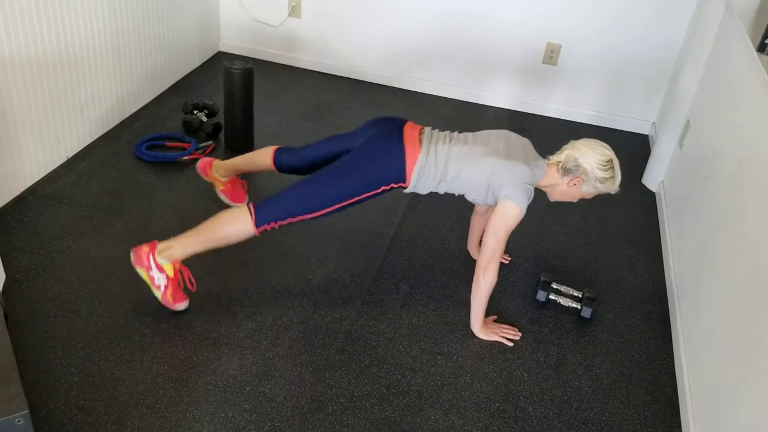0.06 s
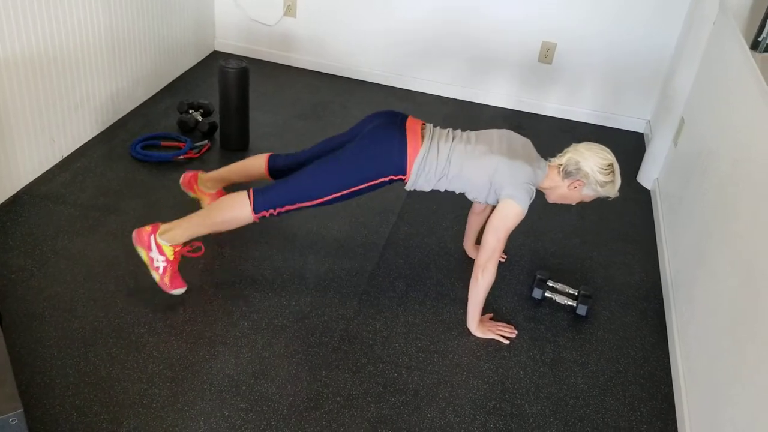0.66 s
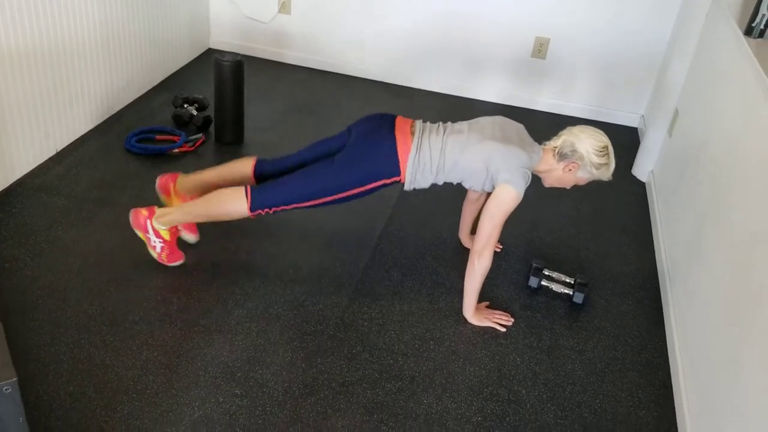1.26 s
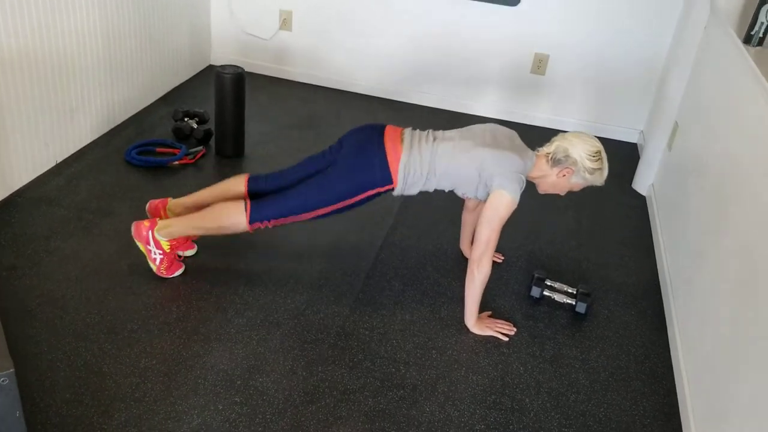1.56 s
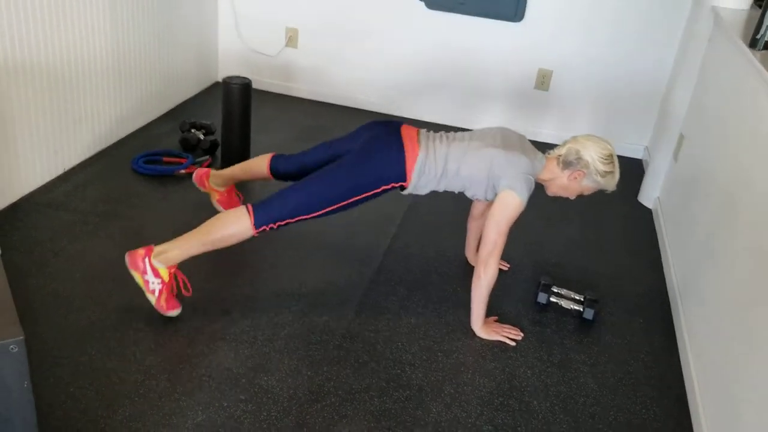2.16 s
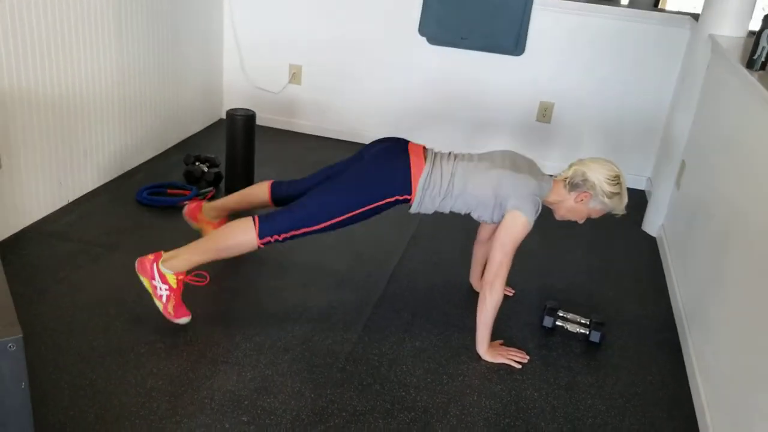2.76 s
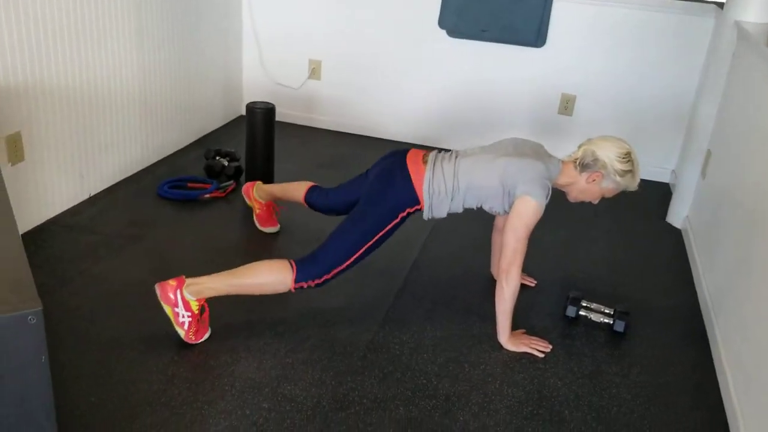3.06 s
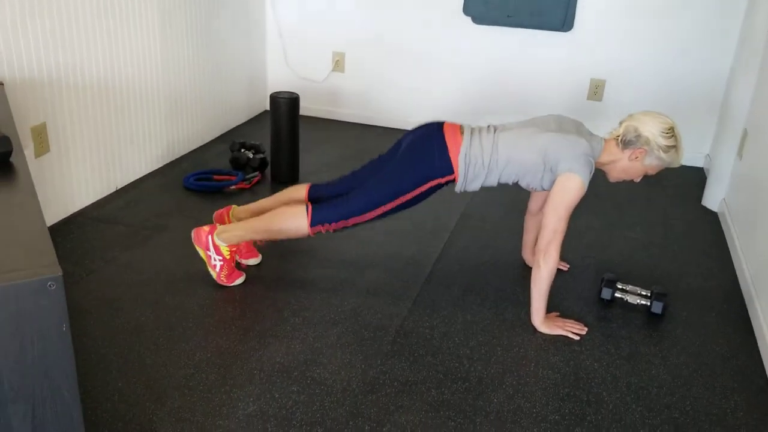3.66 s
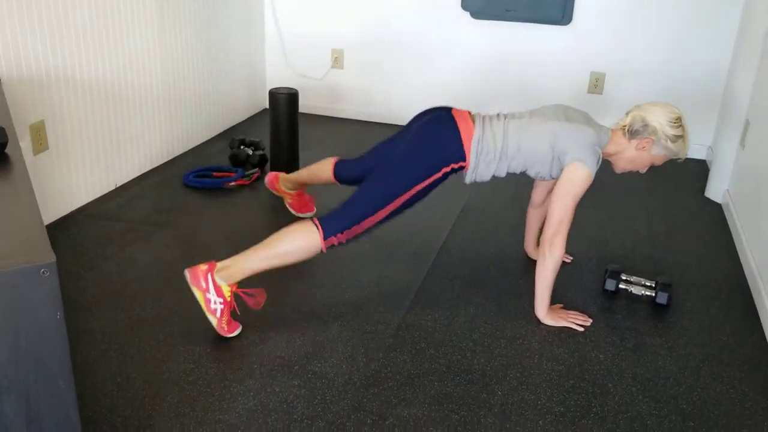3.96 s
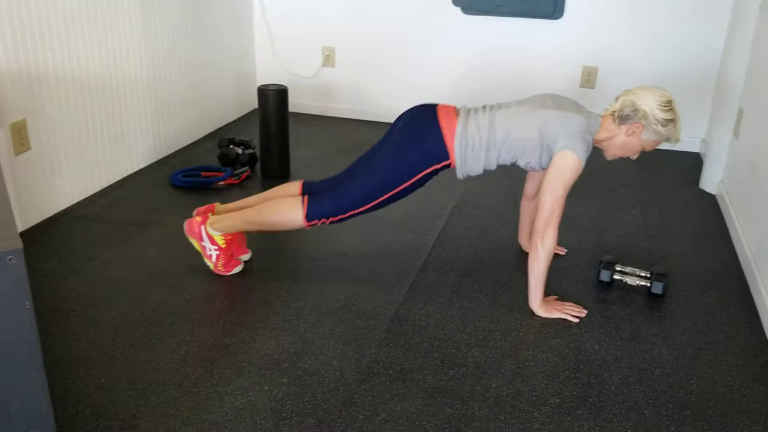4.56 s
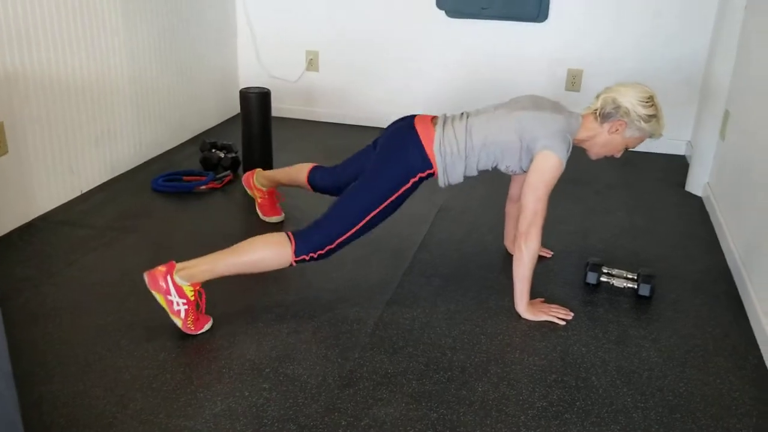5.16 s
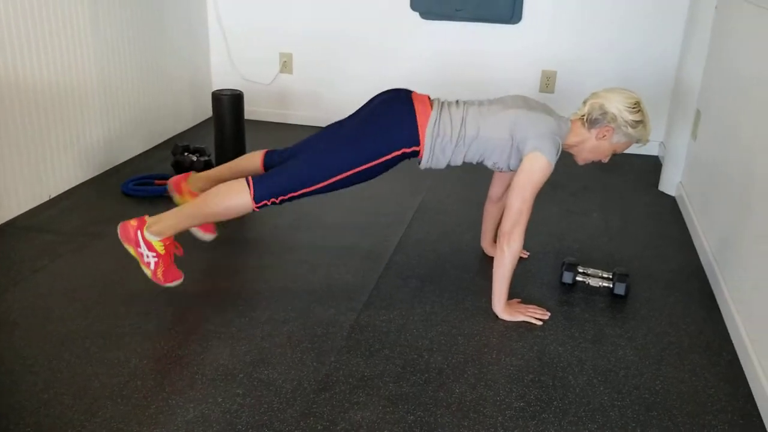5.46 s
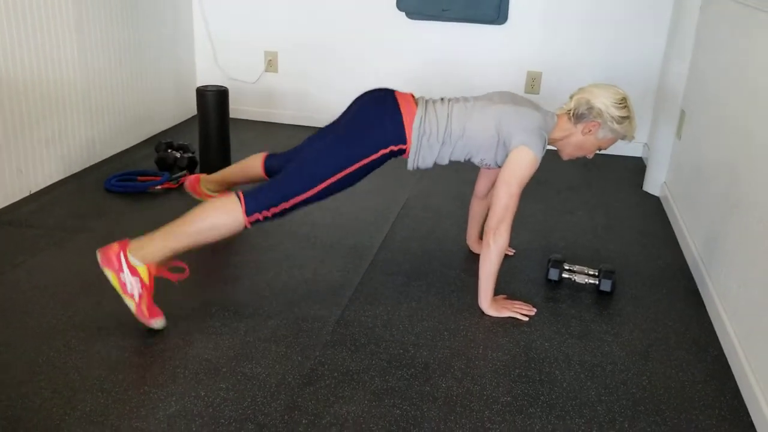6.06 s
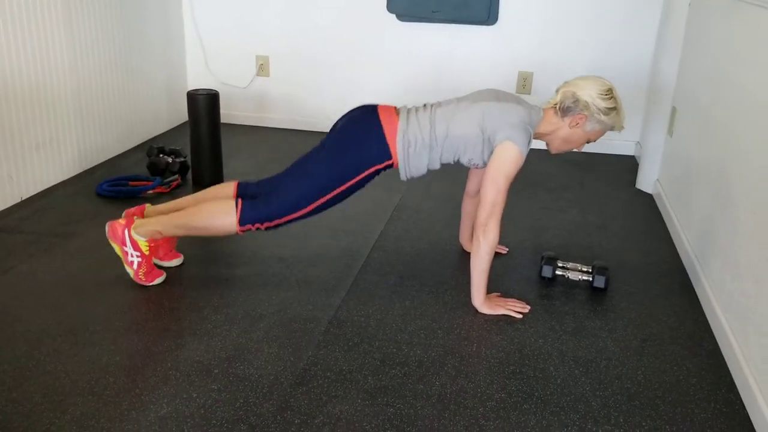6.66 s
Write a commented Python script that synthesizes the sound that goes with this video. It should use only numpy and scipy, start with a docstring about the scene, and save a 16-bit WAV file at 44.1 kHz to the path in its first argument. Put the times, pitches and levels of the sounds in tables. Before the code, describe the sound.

Sneakers slap and thump on a rubber floor about twice a second in a small, echoing room.

```python
"""Sneakers slap and thump on rubber flooring, about twice a second: plank jacks in a small, hard room.
Two shoes land almost together. The toes slap and scuff, the body's weight follows and booms through
the floor, and the walls answer. Leggings swish faintly before each landing.
A camera close by hears it over low room rumble and its own hiss, and turns the quietest treble down."""
import sys
import numpy as np
from scipy import signal
from scipy.fft import rfft, irfft, next_fast_len
from scipy.io import wavfile
from scipy.ndimage import uniform_filter1d

SR = 44100
rng = np.random.default_rng(int(sys.argv[2]) if len(sys.argv) > 2 else 0)


def unload_wav(signal):
    """Save mono or channel-first audio to the path in sys.argv[1] as 16-bit WAV at rate SR, clipped to [-1, 1]."""
    wavfile.write(
        sys.argv[1],
        SR,
        np.round(np.clip(np.atleast_2d(signal).T, -1, 1) * 32767).astype(np.int16),
    )


N = 299439

# Cue list, one row per landing: (time [s], second shoe's lag [s], first shoe against second [dB],
# sole strike [dB], body weight [dB], tread scuff [dB], scuff's upper edge [Hz])
LANDING_CUES = [ (-.41, 0.023, 0, -30, -41, -61, 4000), (.129, 0.021, -0.5, -35, -30.5, -61.5, 5100),
                (.671, .015, -12.5, -33, -27.5, -56, 5500), (1.207, 0.016, -1, -31, -26.5, -54.5, 5100),
                (1.716, 0.017, -2.5, -31, -31, -60, 3100), (2.235, 0.013, 5, -32.5, -26, -66, 5300),
                (2.762, .017, -1.5, -33.5, -42, -58.5, 3200), (3.304, 0.0092, -4, -34, -37, -64.5, 5100),
                (3.853, 0.026, -2, -30, -32, -56, 5000), (4.409, .017, -6.5, -30, -31, -57, 5600),
                (4.923, .015, -7, -29.5, -30, -59, 3900), (5.459, .013, -4, -29, -30.5, -56, 6200),
                (6.007, 0.013, 7.5, -31.5, -33, -53, 6500), (6.517, 0.0097, -16, -33, -29, -62.5, 5200)]
# A sole drags over the rubber: (time [s], decay time [s], knock [dB], scuff [dB])
DRAG_CUES = [(.205, 0.018, -57, -67.5), (4.491, 0.022, -44, -71.5), (5.983, 0.033, -42, -80)]
# The floor under the body's weight: (ratio to thump pitch [1], level [dB], swell time [s])
THUMP_MODES = [(0.289, -28, 0.056), (.43, -14, .04), (.73, -14, .03), (0.999, 6, 0.01562),
               (1.22, -15.5, 0.0296)]
# Standing waves between floor, ceiling and walls: (frequency [Hz], level [dB], T60 [s])
STANDING_MODES = [(152.1, -4.5, 0.61), (172.3, -5, 0.34), (233.3, -1.5, 0.36), (263.4, -4.5, 0.43),
                  (329.4, -5.5, 0.35), (491.3, 3, 0.089)]
# Tone colour of each layer: (frequency [Hz], spectral level [dB])
RUMBLE_EQ = [(22, -11), (45, -3), (100, -5), (200, -13.5), (350, -10.5), (700, -36), (1300, -30),
             (2500, -42.5), (5000, -78.5)]  # low room tone
HISS_EQ = [(1470, -22.5), (2500, -2), (6590, -9), (8350, -9.5), (11300, -6.5), (15100, -6), (15500, -8.5)]  # the camera's own noise
CLOTH_EQ = [(800, -8), (1400, 3.5), (3000, -2), (5000, -5), (8000, -27)]  # rubbing leggings
KNOCK_EQ = [(25, -46), (70, -1.5), (130, 3.5), (170, 1.5), (265, 0), (330, -3), (410, -6.5), (485, -7),
            (640, -14), (1000, -36), (2500, -62)]  # the sole's soft knock
SLAP_EQ = [(200, -32), (480, -13), (690, -4), (800, -1), (930, 0), (1060, 1), (1220, 2.5), (1550, -2.5),
           (2000, -10.5), (2600, -11.5), (4000, -9.5), (8000, -28)]  # its flat slap
SCUFF_EQ = [(600, -24.5), (1800, 5), (2700, 3.5), (3600, 1), (4700, -4.5), (5800, -10.5), (7300, -28),
            (9000, -18.5)]  # tread on rubber
FIZZ_EQ = [(3000, -16), (6500, -8), (8700, -25), (9500, 0.5), (10300, 1), (11500, 1), (12100, -10.5),
           (15500, -21.5)]  # high fizz of scuffs and swishes, coloured by the microphone's 9-12 kHz peak
# The reverb's fast and slow decay: (frequency [Hz], T60 [s])
FAST_DECAY = [(60, 0.39), (150, 0.51), (400, 0.35), (1200, 0.47), (3000, 0.61), (6000, 0.42), (11000, 0.36)]
SLOW_DECAY = [(60, 0.77), (300, 1.39), (700, 1.284), (1400, 1.136), (2500, 1.5), (5000, 0.42),
              (11000, 0.26)]
# Stereo image of diffuse sound: (frequency [Hz], left-right correlation [1])
STEREO_CORRELATION = [(60, 1), (125, 0.95), (250, 0.85), (500, 0.69), (1000, -0.037), (2000, -0.041),
                      (5000, -0.015)]
# The camera's noise suppressor when shut: (frequency [Hz], gain [dB])
SHUT_EQ = [(400, 2.15), (1200, 1), (2800, -5), (6000, -4), (11000, -4.5)]

RING = 52920  # samples in one hit with its tail
t = np.arange(RING) / SR
BLOW_S = .1  # a hit's level is its rms over this opening stretch


def amp(db):
    """Decibels to gain."""
    return 10 ** (np.asarray(db) / 20)


def along(points, hz):
    """Read a curve of (frequency [Hz], value) points on a log axis."""
    freqs, values = np.transpose(points)
    return np.interp(np.log(hz + 1), np.log(freqs), values)


def norm(x):
    """Scale to an average energy of 1 per channel."""
    return x / np.sqrt(np.mean(np.sum(x ** 2, axis=-1)) + 1e-20)


def convolve(a, b):
    """Stereo convolution, one ring long."""
    return signal.fftconvolve(np.atleast_2d(a), np.atleast_2d(b), axes=1)[:, :RING]


def colour(spectrum, edge_hz=SR, order=12):
    """Minimum-phase impulse response of an EQ curve; a softer contact has a lower upper edge."""
    size = RING // 6
    hz = np.fft.rfftfreq(size, 1 / SR)
    gain = amp(along(spectrum, hz)) / np.sqrt(1 + (hz / edge_hz) ** order)
    cepstrum = irfft(np.log(gain + 1e-6), size)
    cepstrum[1:size // 2] *= 2
    cepstrum[size // 2 + 1:] = 0
    return irfft(np.exp(rfft(cepstrum)), size)


def add(track, at_s, sound, db):
    """Lay a hit into the track at a level taken over one blow."""
    start = int(at_s * SR)
    level = np.sqrt(np.mean(sound[:, :int(BLOW_S * SR)] ** 2)) + 1e-12
    track[:, max(start, 0):start + RING] += amp(db) / level * sound[:, max(-start, 0):N - start]


def diffuse(size, gain=lambda hz: 1):
    """Noise from all sides: centred in the bass, wide in the treble."""
    hz = np.fft.rfftfreq(size, 1 / SR)
    width = np.arccos(np.clip(along(STEREO_CORRELATION, hz), -1, 1)) / 2
    spectra = rfft(rng.standard_normal((2, size))) * gain(hz)
    mid, side = irfft(spectra * [np.cos(width), np.sin(width)], size)
    return np.array([mid + side, mid - side])


def noise_bed(spectrum):
    """A steady, coloured stereo bed of rms 1."""
    noise = diffuse(next_fast_len(N), lambda hz: amp(along(spectrum, hz)))
    return np.sqrt(N) * norm(noise[:, :N])


def reverb(source, late_db, build_s, late_build_s=0.035):
    """The source's energy fills the room and drains away by band, first fast, then slowly."""
    hz, times, wash = signal.stft(diffuse(RING), SR, nperseg=256)

    def decay(t60, rise_s):
        fall = amp(-60 * times / along(t60, hz)[:, None])
        return norm(fall * (1 - np.exp(-times / rise_s))) ** 2

    send = np.sum(abs(signal.stft(source, nperseg=256)[2]) ** 2, axis=0)
    draining = decay(FAST_DECAY, build_s) + amp(late_db) ** 2 * decay(SLOW_DECAY, late_build_s)
    energy = signal.fftconvolve(draining, send[None], axes=1)[:, :len(times)]
    return norm(signal.istft(wash * np.sqrt(abs(energy)), nperseg=256)[1][:, :RING])


def room(source, direct_db, late_db, wall_db, echoes=7):
    """From the feet to the microphones: the straight path, a few near walls, then reverb."""
    paths = np.zeros((2, SR // 20))
    paths[[0, 1], [0, 3]] = amp(direct_db)  # the right side hears it 3 samples later
    for delay, skew in zip(rng.uniform(.003, .024, echoes), rng.uniform(-.0003, .0003, echoes)):
        paths[[0, 1], [int((delay + skew) * SR), int((delay - skew) * SR)]] += amp(wall_db)
    return convolve(norm(source), paths) + reverb(source, late_db, build_s=0.0018)


def standing_waves(spread_db, build_s=0.022):
    """Each spot on the floor rings the room's modes with its own strengths and phases."""
    hz, db, t60 = np.transpose(STANDING_MODES)[:, :, None]
    strength, phase = rng.standard_normal((2, len(hz), 1))
    rings = amp(db + spread_db * strength - 60 * t / t60) * np.sin(2 * np.pi * (hz * t + phase))
    return norm(rings.sum(axis=0) * (1 - np.exp(-t / build_s)))


def leggings(lead_s=.175, half_width_s=.06, rise_db_per_s=1.9):
    """Cloth swishes as the legs swing before each landing, growing livelier through the set."""
    now = np.arange(N) / SR
    peaks = np.array(LANDING_CUES)[:, :1] - lead_s
    swings = np.exp(-((now - peaks) / half_width_s) ** 2).sum(axis=0)
    cloth = amp(-84.5) * noise_bed(CLOTH_EQ) + amp(-90) * noise_bed(FIZZ_EQ)
    return swings * amp(rise_db_per_s * now) * cloth


def grains(decay_s, spiky):
    """Gritty friction: tread blocks catch and let go, ever more weakly."""
    sizes = np.exp(spiky * rng.standard_normal(RING))
    return norm(rng.standard_normal(RING) * sizes * np.exp(-t / decay_s))


def sole_rubs(knock, fizz, settle_after_s=.08, settle_decay_s=0.012):
    """Soles rub the rubber: a small settle after every landing, now and then a longer drag."""
    track = np.zeros((2, N))
    slap, scuff = colour(SLAP_EQ, edge_hz=2300), colour(SCUFF_EQ, edge_hz=4900)
    layers = np.array([norm(layer) for layer in (knock, slap, scuff, fizz)])
    settles = [(at_s + settle_after_s, settle_decay_s, strike_db - 18, scuff_db - 21)
               for at_s, _, _, strike_db, _, scuff_db, _ in LANDING_CUES]
    for at_s, decay_s, knock_db, scuff_db in [*DRAG_CUES, *settles]:
        slap_db, fizz_db = knock_db - 18, scuff_db - 3.5
        gains = amp([knock_db, slap_db, scuff_db, fizz_db])
        tread = room(grains(decay_s, spiky=0.48), direct_db=-5.5, late_db=-18, wall_db=-15.5)
        add(track, at_s, convolve(tread, gains @ layers), 20 * np.log10(np.linalg.norm(gains)))
    return track


def two_shoes(lag, first_db, roll_s, roll_db):
    """A flam of two toes: each clicks down, then rolls onto its tread."""
    first, second = [(t == 0) + amp(roll_db) * grains(roll_s, spiky=0.5) for _ in range(2)]
    return amp(first_db) * first + np.pad(second, (int(lag * SR), 0))[:RING]


def floor_thump(pitch_hz, lag, first_db, steepness=1.52):
    """Each leg's weight arrives softly: the floor's modes swell and fade, and the room booms."""
    def push(age):
        age = np.maximum(age, 0)
        return (age * np.exp(1 - age)) ** steepness

    weight = np.zeros(RING)
    for ratio, db, swell_s in THUMP_MODES:
        legs = amp(first_db) * push(t / swell_s) + push((t - lag) / swell_s)
        weight += amp(db) * legs * np.cos(2 * np.pi * pitch_hz * ratio * (t - lag - swell_s))
    boom = convolve(weight, reverb(1. * (t == 0), late_db=-10.5, build_s=0.017))
    return norm(weight) + amp(-9) * norm(boom)


def sole_knock(lag, first_db, knock):
    """The cushioned soles give a round knock that sets the standing waves ringing."""
    contact = two_shoes(lag, first_db, roll_s=0.0063, roll_db=-5.5)
    cushion = room(contact, direct_db=-10.5, late_db=-15, wall_db=-12)
    return norm(convolve(cushion, knock)) + amp(-5.5) * standing_waves(spread_db=5)


def sole_slap(lag, first_db, harder_db, hz_per_db=60.5):
    """The soles smack flat on the rubber; a harder strike is brighter."""
    contact = two_shoes(lag, first_db, roll_s=0.014, roll_db=5)
    sole = room(contact, direct_db=-7, late_db=-12.5, wall_db=-15)
    return convolve(sole, colour(SLAP_EQ, edge_hz=2016 + hz_per_db * harder_db))


def tread_scuff(lag, first_db, contrast=1.7):
    """The treads scrape as they roll down; the lighter shoe hardly scuffs."""
    contact = two_shoes(lag, contrast * first_db, roll_s=0.039, roll_db=11)
    return room(contact, direct_db=-4, late_db=-26.5, wall_db=-13.5)


def sneakers(thump_hz=111, drift_hz_per_s=-2.3, usual_strike_db=-32, crisp_hz=5200):
    """Every landing stacks thump, knock, slap, scuff and fizz; the thump sinks in pitch over the set."""
    low, high = np.zeros((2, 2, N))
    knock, fizz = colour(KNOCK_EQ), colour(FIZZ_EQ)
    for at_s, lag, first_db, strike_db, weight_db, scuff_db, scuff_hz in LANDING_CUES:
        add(low, at_s, floor_thump(thump_hz + drift_hz_per_s * at_s, lag, first_db), weight_db)
        add(low, at_s, sole_knock(lag, first_db, knock), strike_db)
        harder_db = strike_db - usual_strike_db
        add(high, at_s, sole_slap(lag, first_db, harder_db), db=-42 + 1.2 * harder_db)
        tread = tread_scuff(lag, first_db)
        add(high, at_s, convolve(tread, colour(SCUFF_EQ, scuff_hz, order=14)), scuff_db)
        fizz_db = -70.5 + 14 * np.log2(scuff_hz / crisp_hz)  # a duller scuff fizzes less
        add(high, at_s, convolve(tread, fizz), fizz_db)
    high += sole_rubs(knock, fizz)
    left = np.array([[1], [-1]])  # the feet sit just left of centre
    return low * amp(.15 * left) + high * amp(0.59 * left)


def scene():
    """The mix: landings and cloth over room rumble and microphone hiss."""
    return sneakers() + leggings() + amp(-60) * noise_bed(RUMBLE_EQ) + amp(-71) * noise_bed(HISS_EQ)


def suppressor(sound, size=512, open_db=10, knee_db=4.5):
    """A soft multiband gate: near a band's noise floor, treble ducks and lows lift a little."""
    hz, _, bands = signal.stft(sound, SR, nperseg=size)
    power = uniform_filter1d(np.mean(abs(bands) ** 2, axis=0), size=5, axis=0)
    level_db = 10 * np.log10(abs(uniform_filter1d(power, size=5, axis=1)) + 1e-20)
    over_floor_db = level_db - np.percentile(level_db, 15, axis=1, keepdims=True)
    shut = .5 - .5 * np.tanh((over_floor_db - open_db) / (2 * knee_db))
    gain = amp(along(SHUT_EQ, hz)[:, None] * shut)
    return signal.istft(bands * gain, SR, nperseg=size)[1][:, :N]


def record(dry):
    """The camera's chain: noise suppressor, tiny fades at both ends, brick-wall low-pass."""
    faded = suppressor(dry) * signal.windows.tukey(N, .002)
    size = next_fast_len(N + SR // 2)
    passband = np.fft.rfftfreq(size, 1 / SR) < 15720
    return irfft(rfft(faded, size) * passband, size)[:, :N]


dry = scene()
out = record(dry)
unload_wav(out)
```